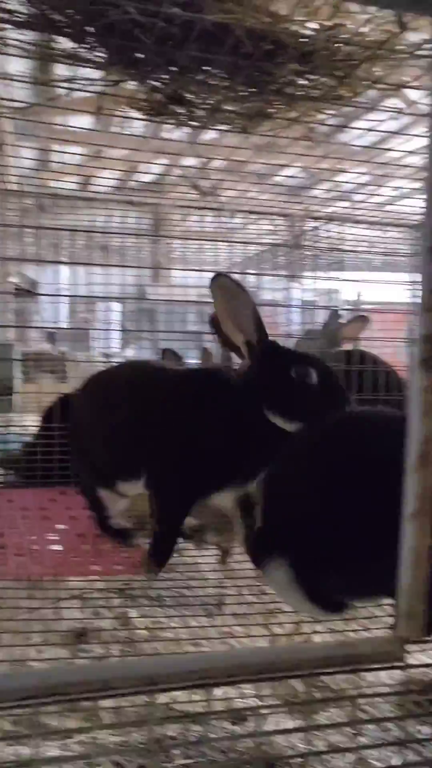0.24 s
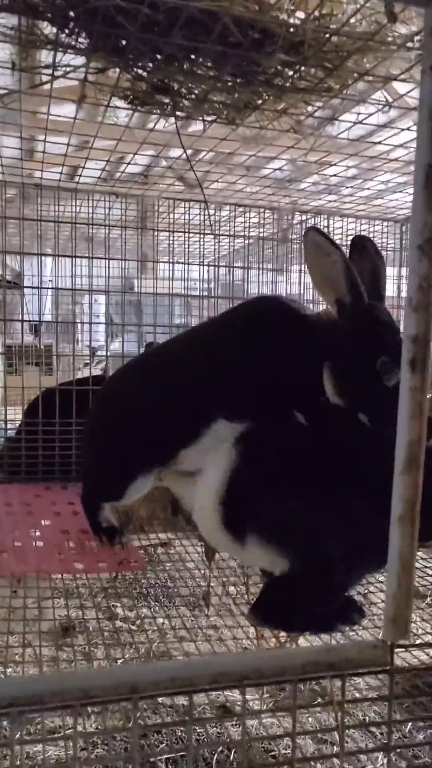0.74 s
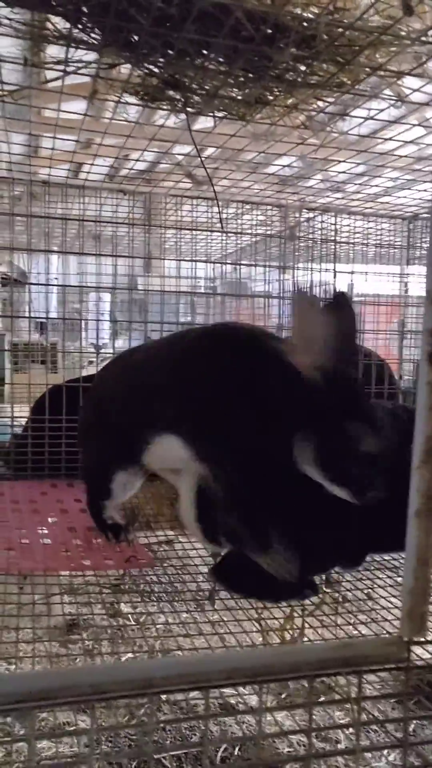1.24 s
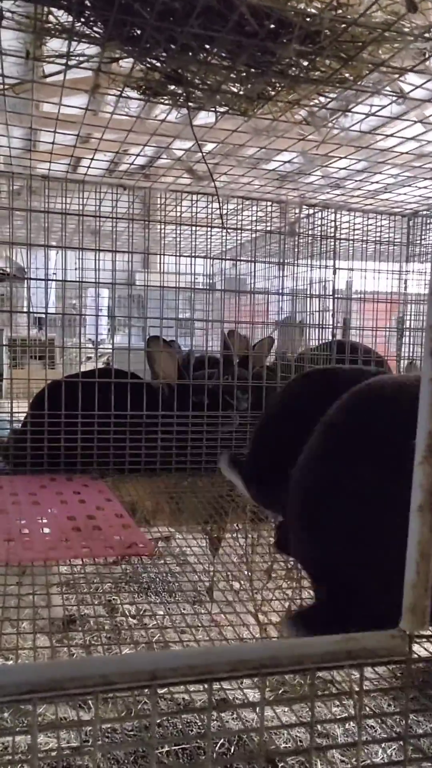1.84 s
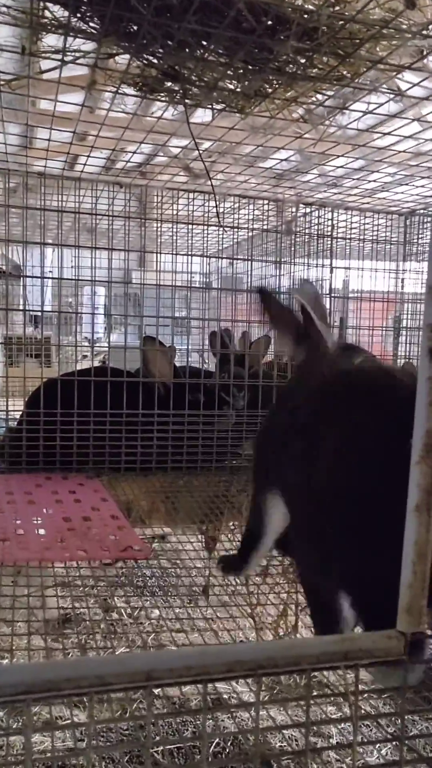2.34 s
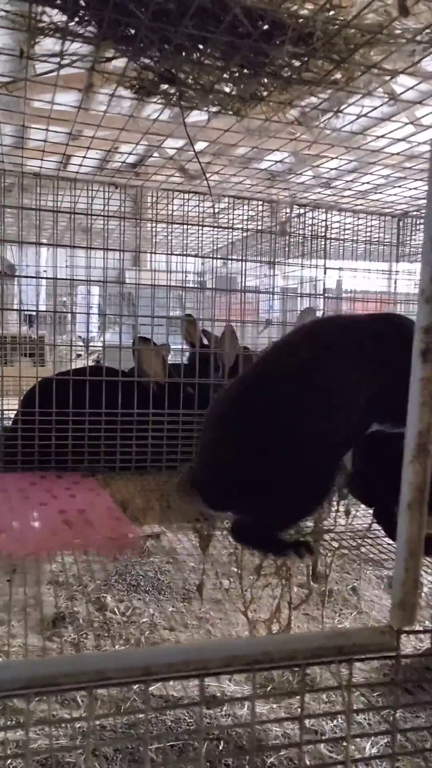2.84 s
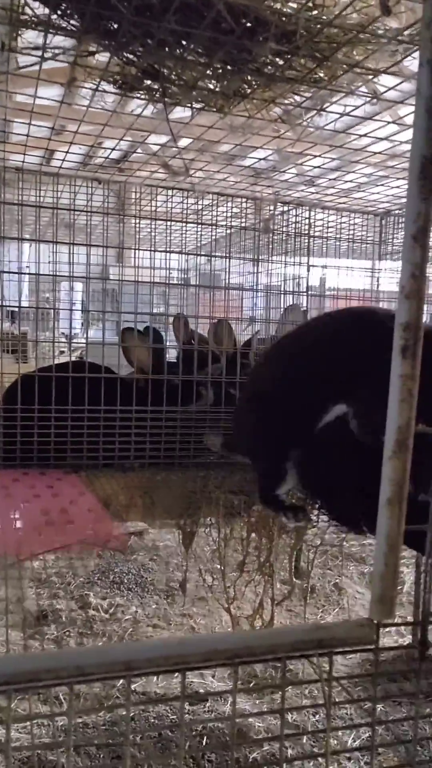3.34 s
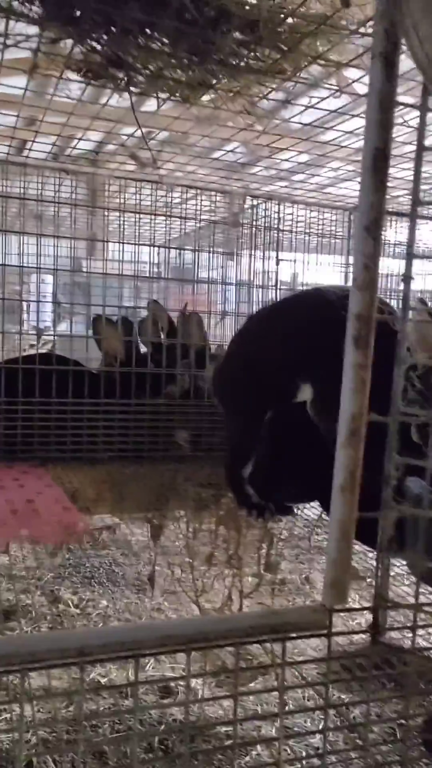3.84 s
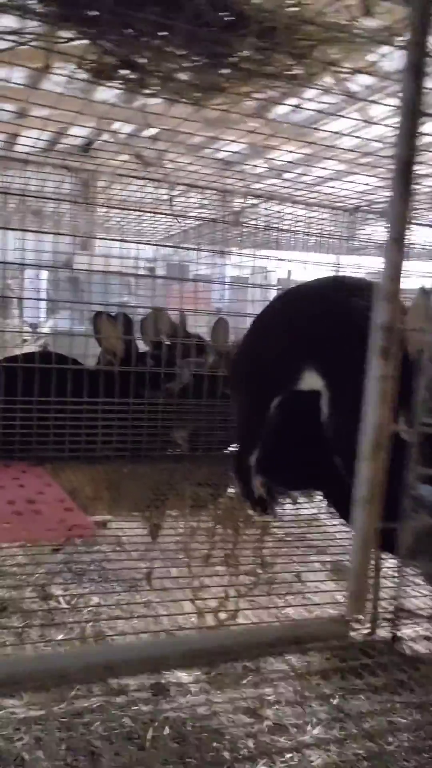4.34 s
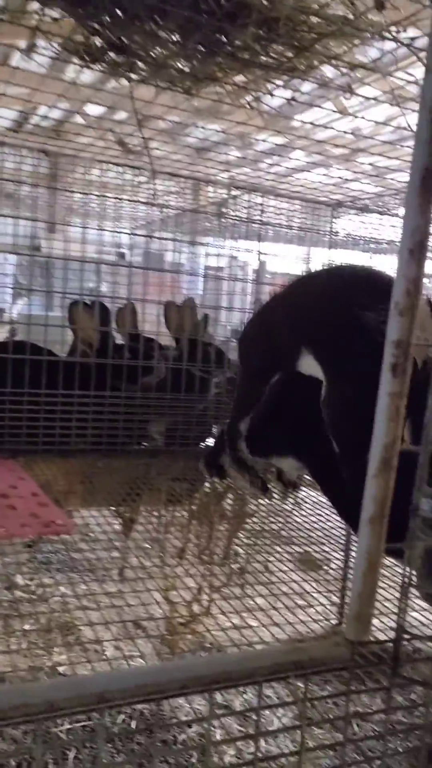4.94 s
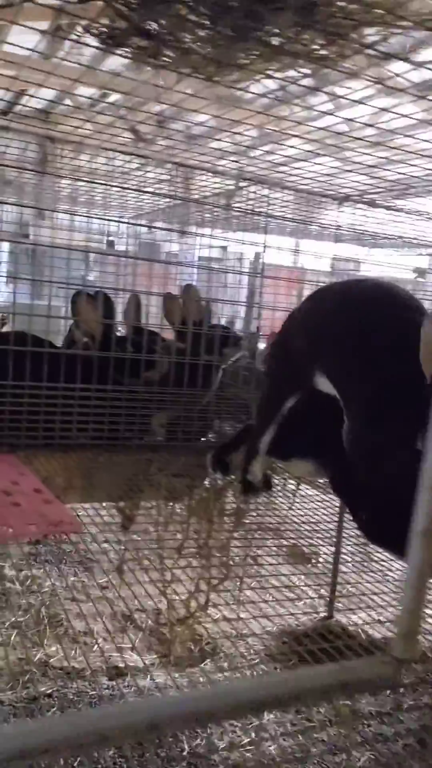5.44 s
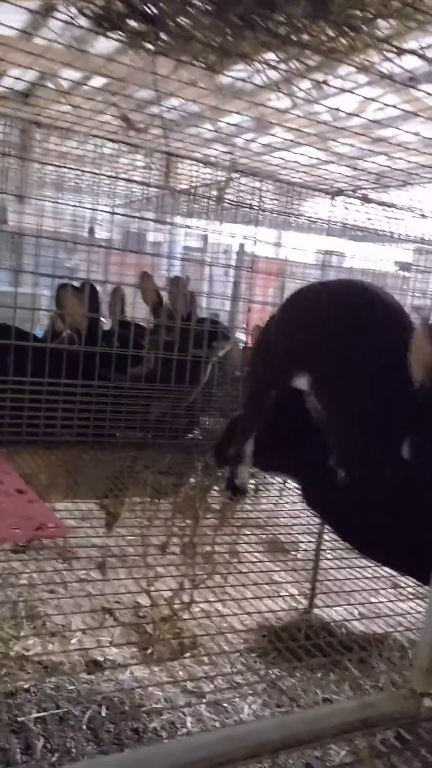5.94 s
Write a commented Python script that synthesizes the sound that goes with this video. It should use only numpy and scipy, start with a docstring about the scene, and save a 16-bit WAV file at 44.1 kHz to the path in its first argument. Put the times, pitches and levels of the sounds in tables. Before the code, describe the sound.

Rabbits hop and scrabble in a wire cage, heard close up over the very faint hush of an open barn. Throughout, their shifting weight makes the mesh floor boom and rumble softly. From about 0.5 to 2 seconds come light claw strikes, scrapes and a few soft landings, each setting off a short, bright chatter of wire. At about 2.5 seconds a hard hop lands with a deep thump, a metallic knock on the frame and a loud clatter. More strong thumps and rattling strikes follow around 2.8 to 3.2 seconds, and busy scrabbling continues until about 4.2 seconds, with loose wires rattling faintly between hits. The activity then turns lighter and slightly duller. A sharp scrape and tick stand out just after 5 seconds, followed by two softer landings and scattered dry claw ticks until about 6.2 seconds.

```python
"""Rabbits in a wire cage

An open barn, a two-port microphone close to the cage. Rabbits hop and scrabble: their weight makes
the mesh floor boom, paws knock the frame, and claws strike, scrape and tick the wires, which chatter
in short bright bursts. Between strikes the cage rattles faintly over the far hush of the barn."""
import sys
import numpy as np
from scipy import signal
from scipy.fft import rfft, irfft, next_fast_len
from scipy.io import wavfile
from scipy.ndimage import uniform_filter1d, map_coordinates

SR = 44100
rng = np.random.default_rng(int(sys.argv[2]) if len(sys.argv) > 2 else 0)


def materialize(psi):
    """Save the field psi as 16-bit PCM at rate SR to the path in sys.argv[1].

    A 1-D psi becomes a single channel; in a 2-D psi each row is a channel.
    """
    bounded = np.clip(np.atleast_2d(psi).T, -1, 1)
    quanta = np.round(bounded * 32767).astype(np.int16)
    wavfile.write(sys.argv[1], SR, quanta)


N = 273398

# weight shifting on the mesh floor: t/s, level/dB
WEIGHT_SHIFTS = [(0.0, -44.5), (0.45, -52.5), (0.76, -44.5), (1.05, -50), (1.28, -50.5), (1.45, -43.5),
                 (1.81, -43.5), (2.15, -55.5), (2.4, -41.5), (2.69, -40.5), (3.5, -39.5), (3.76, -49),
                 (3.88, -38), (4.51, -47), (5.33, -41), (5.89, -47.5), (6.1, -42), (6.2, -50.5)]
# boom of the floor, heard close: f/Hz, level/dB
FLOOR_SPECTRUM = [(20, -8.5), (48, 1.5), (62, -0.5), (85, -4), (101, -2.5), (120, -15.5), (150, -16),
                  (215, -19.5), (260, -28), (360, -25.5), (600, -32.5), (1000, -48.5)]
# still air far back in the barn: f/Hz, level/dB
BARN_SPECTRUM = [(120, -1), (190, -26), (350, -20.5), (800, -5.5), (1000, -12), (1450, -15.5), (2150, -10),
                 (2600, -18), (5600, -16), (9500, -34), (14000, -30)]
# loose wires rattling between strikes: t/s, level/dB
RATTLE_LEVEL = [(0.0, -65), (1.26, -64), (1.57, -50), (2.19, -63.5), (2.55, -45), (3.05, -52), (3.2, -44),
                (3.62, -48.5), (3.85, -43.5), (4.3, -51.5), (4.9, -57), (5.3, -56), (5.62, -50), (6.2, -62)]
# claws striking a wire: t/s, chatter level/dB, ring level/dB
CLAW_STRIKES = [(0.588, -37.5, -55), (0.681, -43, -51.5), (0.724, -52.5, -55.5), (0.793, -35.5, -47),
                (0.966, -42.5, -52), (1.358, -52, -55), (1.61, -41.5, -47.5), (1.644, -36.5, -44),
                (1.696, -40, -47.5), (1.792, -45.5, -51), (1.847, -48, -55), (2.246, -49.5, -56),
                (2.349, -44, -50.5), (2.444, -40.5, -51.5), (2.4738, -21, -31.5), (2.585, -45, -47.5),
                (2.808, -25, -37.5), (2.95, -39, -44), (3.35, -43, -45), (3.433, -30.5, -37.5),
                (3.497, -36, -44), (3.704, -40.5, -45), (3.74, -42.5, -49.5), (3.772, -43, -52.5),
                (3.834, -38, -43.5), (3.899, -43, -45.5), (3.942, -42, -48), (3.997, -45, -48),
                (4.057, -41, -51), (4.131, -46, -54), (4.241, -46, -52), (4.499, -47, -54),
                (4.618, -34.5, -49), (4.706, -42.5, -49), (4.756, -66, -59.5), (5.119, -43, -60),
                (5.163, -40.5, -56.5), (5.253, -45, -53)]
# claws dragged across the mesh: t/s, chatter level/dB, ring level/dB, swell/s
CLAW_SCRAPES = [(1.216, -37.5, -51, 0.018), (1.414, -39, -44.5, 0.032), (2.6, -42, -56, 0.018),
                (2.72, -38, -47.5, 0.024), (2.867, -28, -36, 0.013), (3.138, -38, -44.5, 0.012),
                (3.223, -39.5, -44.5, 0.013), (3.364, -38.5, -43, 0.019), (3.794, -37, -44, 0.0056),
                (4.655, -42, -53, 0.0072), (5.05, -24, -45, 0.023), (5.301, -41.5, -43.5, 0.021),
                (5.561, -35.5, -50.5, 0.028), (5.862, -42.5, -52.5, 0.014)]
# claw tips ticking one wire, dry and bright: t/s, level/dB
CLAW_TICKS = [(0.41, -50), (0.487, -46), (1.429, -35), (1.9869, -68), (2.424, -34), (2.4768, -32),
              (2.8805, -25), (3.4362, -35), (3.741, -32), (4.478, -39), (5.008, -47), (5.059, -23),
              (5.4164, -41), (5.5054, -42), (5.646, -41), (5.769, -36.5), (5.956, -41), (6.0194, -37),
              (6.064, -37), (6.172, -42)]
# wire chattering on wire: f/Hz, level/dB
CHATTER_SPECTRUM = [(5000, -41), (7500, -12), (11000, -9.5), (14000, -1.5)]
# short wire spans: f/Hz, width/Hz, level/dB
SPAN_MODES = [(3086, 370, -5.5), (4120, 1360, -2), (4894, 340, 7.5), (5690, 376, 5), (6405, 340, 2),
              (7380, 550, -1)]
# taut wires that sing on: f/Hz, width/Hz, level/dB
TAUT_MODES = [(1980, 200, -15), (2984, 20.7, -2.5), (5150, 74, -4.5), (5580, 53, 3), (5800, 89, -1.5),
              (6140, 70, -4.5), (7870, 125, -6)]
# members of the cage frame: f/Hz, width/Hz, level/dB
FRAME_MODES = [(737, 306, 4), (842, 67, 8), (1070, 56, 5), (1207, 24, -5.5), (1432, 10.3, 10),
               (1580, 190, -4.5), (2015, 106, 3.5), (2220, 3150, -1.5), (3260, 150, 5)]
# paws knocking the frame: t/s, level/dB, f/Hz of the member hit
PAW_KNOCKS = [(0.655, -47.5, 735), (0.812, -46, 730), (0.85, -73, 620), (1.396, -45, 1430),
              (1.62, -35.5, 574), (1.775, -42.5, 1130), (1.856, -44.5, 1120), (2.253, -39, 1160),
              (2.476, -22.5, 2630), (2.68, -40.5, 860), (2.808, -31.5, 920), (2.872, -35.5, 805),
              (2.878, -27, 1930), (3.15, -36, 930), (3.435, -40, 710), (3.705, -39.5, 815),
              (4.696, -46.5, 1140), (5.066, -42, 850), (5.287, -41, 850), (5.33, -46, 720)]
# hops landing on the floor: t/s, level/dB
HOP_LANDINGS = [(0.7, -36.5), (0.846, -45.5), (1.644, -37), (2.475, -22.5), (2.569, -34), (2.804, -28),
                (2.871, -23), (3.146, -24), (3.356, -36), (3.701, -28), (3.814, -33.5), (4.177, -35),
                (5.336, -36.5), (5.655, -32.5)]
# floor panel when struck: f/Hz, level/dB, t60/s
PANEL_MODES = [(50.4, -0.5, 0.27), (70.6, 1.5, 0.27), (100.9, -2.5, 0.59), (142.6, -12, 0.24),
               (200.6, -13.5, 0.17)]
# how alike the two ports sound: f/Hz, likeness (0 to 1)
PORT_LIKENESS = [(30, 1), (60, 0.94), (200, 1), (500, 0.58), (2000, 0.25), (5000, 0.51), (15000, 0.17)]
# left port ahead of the right: f/Hz, phase/rad
LEFT_LEAD = [(60, .15), (3010, .8), (4220, -2.4), (6120, -3), (7500, -4.5), (10200, -4.7), (12700, -11)]
# left port over the right: f/Hz, level/dB
LEFT_GAIN = [(100, 0.3), (700, 1.5), (3000, 2.5), (7000, 4), (15000, -0.5)]

STRIKE_RISE_S, STRIKE_T60_S, SCRAPE_T60_S = 0.00078, 0.1, 0.11
SNAP_T60_S, TICK_T60_S = 0.016, 0.015
RING_OUTLASTS = 1.69  # decay time of the spans over that of the chatter
TOP_EDGE_HZ, BAND_LIMIT_HZ = 12800, 15950


def amp(db):
    return 10 ** (np.asarray(db) / 20)


def unit_rms(x):
    return x / np.sqrt(np.mean(x ** 2) + 1e-20)


def along(points, hz):
    """Read (f/Hz, value) points on a log frequency axis."""
    f, values = np.transpose(points)
    return np.interp(np.log(hz + 1), np.log(f + 1), values)


def curve(points):
    """Join (t/s, value) points, one value a sample."""
    times, values = np.transpose(points)
    return np.interp(np.arange(N) / SR, times, values)


def wobble(rate):
    """A smooth random curve, rate knots a second."""
    knots = rng.standard_normal(int(N * rate / SR) + 4)
    return map_coordinates(knots, [np.arange(N) * rate / SR])


def filtered(x, response):
    """Pass x through a complex frequency response."""
    size = next_fast_len(N + SR // 2)
    return irfft(rfft(x, size) * response(np.fft.rfftfreq(size, 1 / SR)), size)[..., :N]


def modes(table):
    """The causal response of a set of resonances, alternating in sign."""
    return lambda f: sum((-1) ** k * amp(db) * 1j * f * width / (hz * hz - f * f + 1j * f * width)
                         for k, (hz, width, db) in enumerate(table))


def shaken(envelope, response):
    """Two unrelated noises under one envelope, through a body; rms follows the envelope."""
    noise = rng.standard_normal((2, N))
    return filtered(noise * envelope, response) / np.std(filtered(noise[0], response))


def patchy(x, depth_db, bins, frames):
    """Vary the colour from moment to moment with a random gain over frequency and time."""
    spectra = signal.stft(x, nperseg=256)[2]
    field = uniform_filter1d(rng.standard_normal(spectra.shape[1:]), bins, axis=0)
    field = uniform_filter1d(field, frames, axis=1)
    gain = amp(depth_db * unit_rms(field))
    return signal.istft(spectra * unit_rms(gain), nperseg=256)[1][:, :N]


def floor_boom():
    """Soft paws push the mesh, which answers in its lowest modes."""
    weight = amp(curve(WEIGHT_SHIFTS) + 1.5 * wobble(25))
    return shaken(weight, lambda hz: amp(along(FLOOR_SPECTRUM, hz)))


def barn_air():
    """A hush far behind the cage, its colour drifting."""
    hush = shaken(amp(-66), lambda hz: amp(along(BARN_SPECTRUM, hz)))
    return patchy(hush, depth_db=2, bins=3, frames=80)


def loose_rattle(count):
    """The envelope of loose wires touching softly at random moments."""
    touches, t = np.zeros(N), np.arange(SR // 5) / SR
    when, size = rng.random((count, 2)).T
    touches[(when * N).astype(int)] = amp(-3 * np.log(size + 0.52)) ** 2  # of nearly equal strength
    power = signal.fftconvolve(touches, (t / .004) ** 2 * amp(-120 * t / 0.059))[:N]
    return amp(curve(RATTLE_LEVEL)) * np.sqrt(np.abs(power) / power.mean() + 0.067)


def claws():
    """Chatter and ring envelopes: strikes and scrapes swell and die; ticks feed only the chatter."""
    chatter_power, ring_power = np.zeros((2, N + SR))
    t = np.arange(SR // 2) / SR
    strikes = [(*row, STRIKE_RISE_S, STRIKE_T60_S) for row in CLAW_STRIKES]
    scrapes = [(*row, SCRAPE_T60_S) for row in CLAW_SCRAPES]
    for start, chatter_db, ring_db, rise, t60 in strikes + scrapes:
        swell = np.sin(np.pi / 2 * np.clip(t / rise, 0, 1)) ** 2
        after = np.maximum(t - rise, 0)
        burst = lambda decay_s: swell * amp(-60 * after / decay_s)
        snap = swell ** 4 * burst(SNAP_T60_S)  # the claw's sharp contact, atop the swell
        at = slice(round(start * SR), round(start * SR) + len(t))
        chatter_power[at] += amp(chatter_db) ** 2 * (burst(t60) ** 2 + snap ** 2)
        ring_power[at] += amp(ring_db) ** 2 * (burst(RING_OUTLASTS * t60) ** 2 + snap ** 2)
    for start, db in CLAW_TICKS:
        chatter_power[round(start * SR):][:len(t)] += amp(db - 60 * t / TICK_T60_S) ** 2
    return np.sqrt(chatter_power[:N]), np.sqrt(ring_power[:N])


def wires():
    """Claws and loose wires set the mesh chattering; spans, taut wires and frame ring with it."""
    claw_chatter, claw_ring = claws()
    rattle = loose_rattle(count=240)
    clash = np.hypot(claw_chatter, amp(-8) * rattle)
    shake = np.hypot(claw_ring, amp(-10.5) * rattle)
    contacts = lambda: unit_rms(amp(2.2 * wobble(400)))  # single contacts inside each burst
    chatter = shaken(contacts() * clash, lambda hz: amp(along(CHATTER_SPECTRUM, hz)))
    top = filtered(chatter, lambda hz: hz > TOP_EDGE_HZ)
    top_gain = amp(curve([(3.9, 0.5), (4.4, -5)]))  # duller as the rabbits turn away
    chatter += (top_gain - 1) * top
    radiation = lambda hz: hz ** 4 / (hz ** 4 + 2500. ** 4)  # thin wire gives little bass
    spans = shaken(contacts() * shake, lambda hz: modes(SPAN_MODES)(hz) * radiation(hz))
    taut = shaken(amp(-5.5) * shake, modes(TAUT_MODES))
    slow_shake = uniform_filter1d(shake, int(0.022 * SR))  # the heavy frame follows slowly
    frame = shaken(amp(-8.5) * slow_shake, modes(FRAME_MODES))
    # different wires sound from moment to moment
    return patchy(chatter + spans + taut + frame, depth_db=2.2, bins=3, frames=12)


def frame_knocks():
    """A paw gives a short rough push; members nearest in pitch to the one hit are favoured."""
    out, size = np.zeros((2, N + SR)), SR // 2
    t, f = np.arange(size) / SR, np.fft.rfftfreq(size, 1 / SR)
    attack = 1 - np.exp(-t / 0.00058)
    decay = amp(-60 * t / 0.027) + 0.33 * amp(-60 * t / 0.48)
    for start, db, hit_hz in PAW_KNOCKS:
        push = rng.standard_normal((2, size)) * attack * decay
        push *= amp(rng.normal(0, 3.44, size // 100 + 1).repeat(100)[:size])  # shaken joints rattle
        members = []
        for hz, width, level in FRAME_MODES:
            drop_db = min(28 * abs(np.log2(hz / hit_hz)), 15)
            members.append((hz * (1 + rng.normal(0, 0.015)), width, level - drop_db))
        ring = irfft(rfft(push) * modes(members)(f), size)
        out[:, round(start * SR):][:, :size] += amp(db - 1) * ring / np.abs(ring).max()
    return out[:, :N]


def landings():
    """A body dropping on the mesh starts its lowest modes together and leaves it rumbling."""
    thumps, rumble = np.zeros((2, N + SR)), np.zeros(N + SR)
    t = np.arange(SR // 2) / SR
    attack = 1 - np.exp(-t / 0.013)
    for start, db in HOP_LANDINGS:
        ring = np.zeros(len(t))
        for hz, level, t60 in PANEL_MODES:
            decay = amp(level + rng.normal(0, 5.5) - 60 * t / t60)
            ring += decay * np.sin(2 * np.pi * hz * (1 + rng.normal(0, 0.047)) * t)
        at = slice(round(start * SR), round(start * SR) + len(t))
        thumps[0, at] -= amp(db) * ring * attack  # mid only: both ports share the thump
        rumble[at] += amp(db - 5.5 - 60 * t / 0.59)
    return thumps[:, :N] + shaken(rumble[:N], lambda hz: amp(along(FLOOR_SPECTRUM, hz)))


def scene():
    """Cage close, barn beyond: the ports hear a shared part, shifted in phase, and one of their own."""
    cage = floor_boom() + landings() + frame_knocks() + wires()
    spread = lambda hz: np.arccos(np.clip(along(PORT_LIKENESS, hz), 0, 1)) / 2
    mid, side = filtered(cage + barn_air(), lambda hz: np.array([np.cos(spread(hz)), np.sin(spread(hz))]))
    left = lambda hz: amp(along(LEFT_GAIN, hz) / 2) * np.exp(.5j * along(LEFT_LEAD, hz))
    return filtered(np.array([mid + side, mid - side]), lambda hz: np.array([left(hz), 1 / left(hz)]))


def record(dry):
    """The microphone ports dip just below 10 kHz; nothing passes above the band limit."""
    dip = lambda hz: amp(-7 * np.exp(-((hz - 9700) / 900) ** 2))
    return filtered(dry, lambda hz: dip(hz) * np.clip((BAND_LIMIT_HZ - hz) / 150, 0, 1))


dry = scene()
out = record(dry)
materialize(out)
```